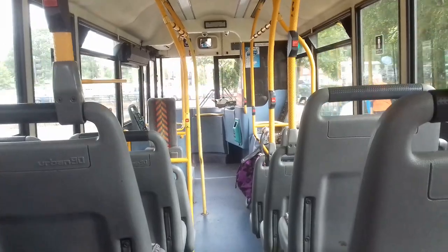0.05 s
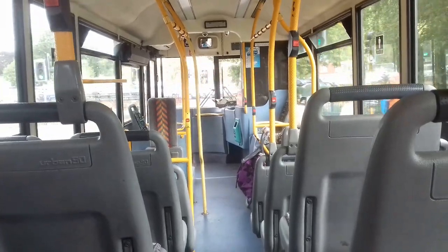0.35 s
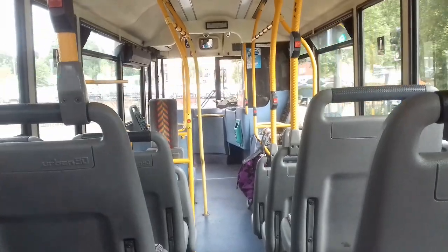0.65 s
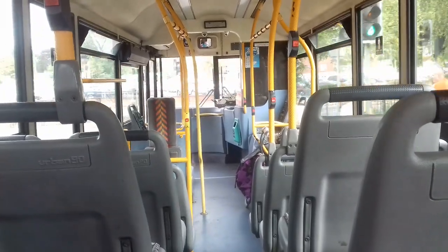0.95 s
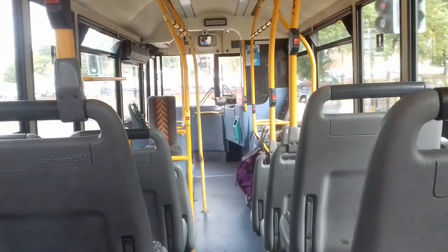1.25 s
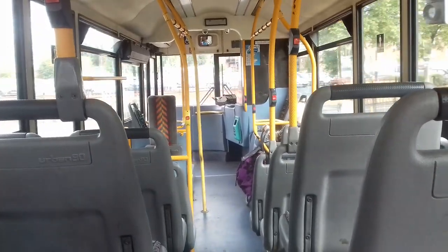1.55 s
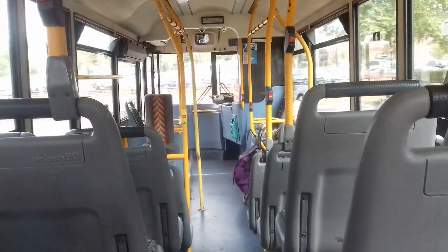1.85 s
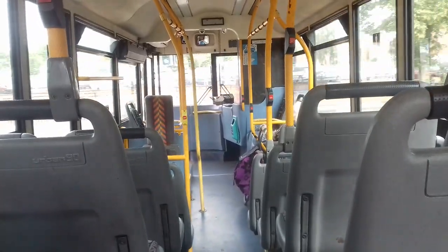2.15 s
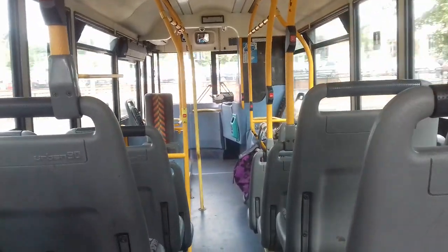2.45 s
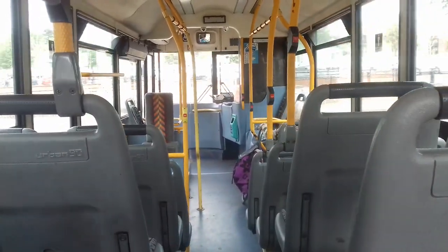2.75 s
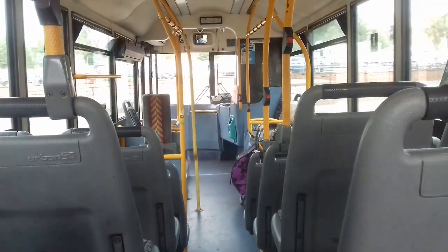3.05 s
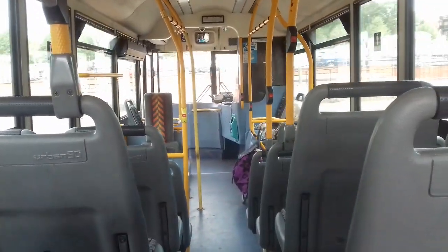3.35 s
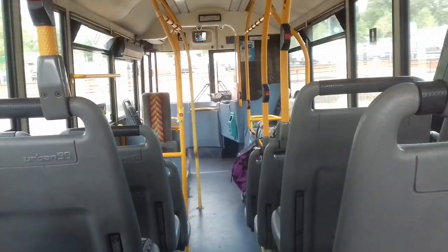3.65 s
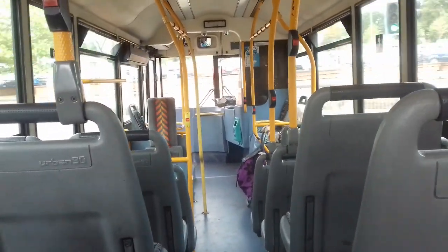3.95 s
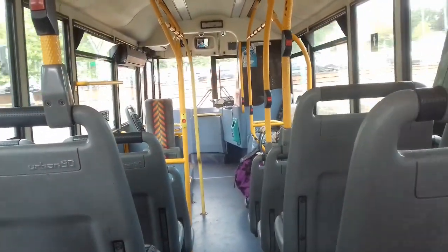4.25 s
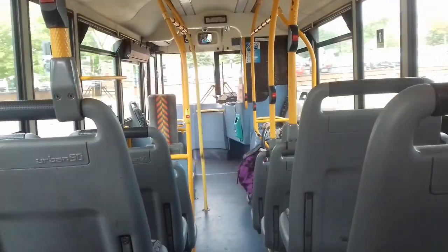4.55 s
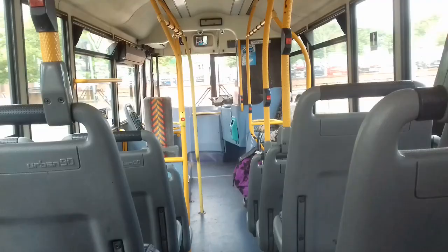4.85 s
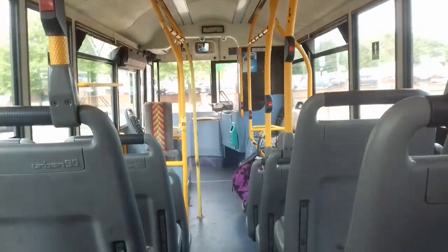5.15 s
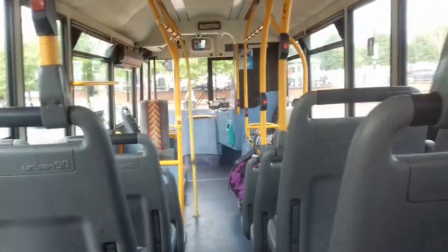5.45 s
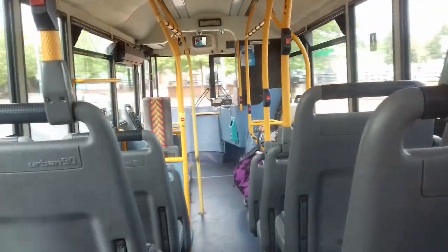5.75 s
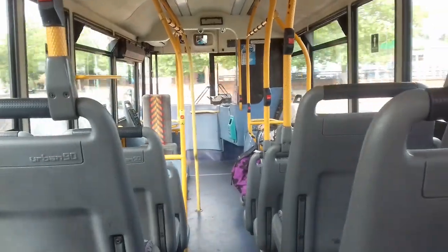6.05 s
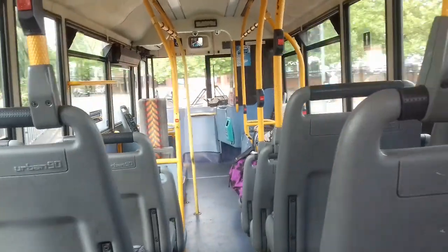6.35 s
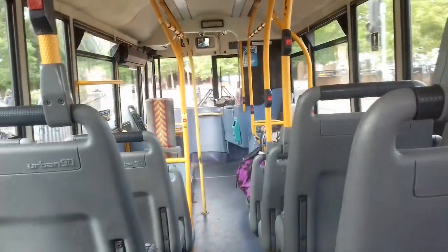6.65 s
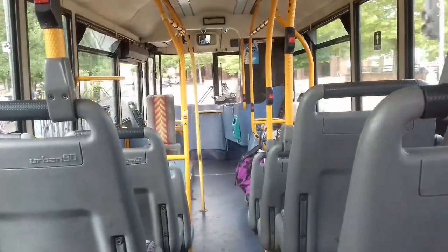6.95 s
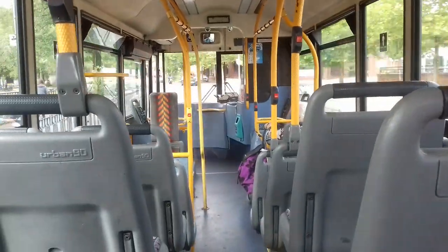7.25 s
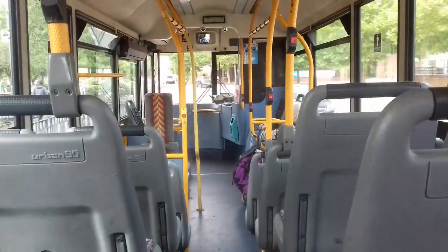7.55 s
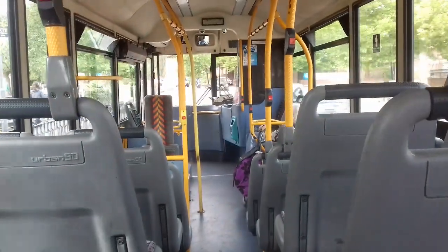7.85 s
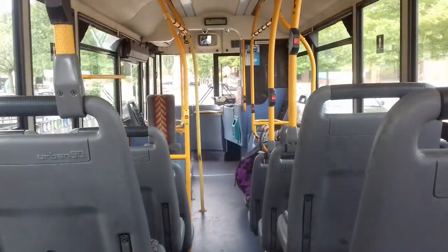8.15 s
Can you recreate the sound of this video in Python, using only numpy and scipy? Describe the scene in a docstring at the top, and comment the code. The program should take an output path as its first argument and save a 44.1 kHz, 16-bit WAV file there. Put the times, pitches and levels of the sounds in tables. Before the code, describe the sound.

From a rear seat inside a city bus, a loud, steady drone sits over a throbbing diesel engine slowly gaining speed. Loose panels buzz in surges that grow stronger, and an air valve spits once. About halfway through, the engine sags at a gear change, with brief trim squeaks and a few knocks. It then climbs again with a thin, rising turbo whistle as the rattling carries on.

```python
"""A loud drone over a throbbing diesel engine, heard from a rear seat as a city bus pulls away.
The drone, probably the cooling fan, follows the engine's speed up to a limit; both sag at a gear
change near 5 s. The fan's overtones (its higher notes) sing out as they cross pitches where the
cabin rings. Loose panels buzz in surges and knock, trim squeaks, an air valve spits once, and the
turbocharger whistles up in the new gear."""
import sys
import numpy as np
from scipy import signal
from scipy.fft import rfft, irfft
from scipy.io import wavfile
from scipy.ndimage import uniform_filter1d

SR = 44100
rng = np.random.default_rng(int(sys.argv[2]) if len(sys.argv) > 2 else 0)


def inscribe(sig):
    """Save sig as 16-bit PCM at rate SR to the path in sys.argv[1].

    A 1-D sig is mono; a 2-D sig holds one channel per row.
    Samples are clipped to [-1, 1] before scaling.
    """
    pcm = np.round(np.clip(np.atleast_2d(sig).T, -1, 1) * 32767)
    wavfile.write(sys.argv[1], SR, pcm.astype(np.int16))


N = 370440
TIME = np.arange(N) / SR

# Tone of the faint hiss. Each row: frequency in Hz, relative level in dB.
HISS_COLOUR = [(100, -3), (6000, 1.5), (8500, 2), (9500, -4.5), (10000, -16.5), (10700, -1.5),
               (14300, -1.5), (15000, -18.5), (15600, -11.5)]
# Squeaks of the trim. Each row: start in seconds, length in seconds, pitch in Hz, level in dB.
SQUEAKS = [(4.497, .35, 2649, -42.5), (4.86, .1, 4660, -67), (5.819, 0.15, 2700, -56.5),
           (5.829, 0.11, 1930, -43)]
# The air valve's spit. Each row: start in seconds, level in dB, seconds to fade by 60 dB.
AIR_SPITS = [(3.535, -32, 0.23)]
# Tone of the spit. Each row: frequency in Hz, relative level in dB.
AIR_COLOUR = [(600, -6.5), (2000, 3.5), (3600, 9.5), (5000, -1), (6500, -10), (7900, -10.5), (9300, -27),
              (10500, -36), (15000, -46)]
# Hard knocks of a panel. Each row: start in seconds, level in dB, seconds to fade by 60 dB.
KNOCKS = [(5.3, -30.5, 0.36), (5.425, -29, 0.045), (5.505, -33, 0.18)]
# Tone of a knock. Each row: frequency in Hz, relative level in dB.
KNOCK_COLOUR = [(900, -20), (2200, -4.5), (2600, 7.5), (3200, -2), (4500, -13), (6000, -23), (9000, -32),
                (11000, -48), (15000, -62)]
# The turbocharger winding up. Each row: time in seconds, pitch in Hz, level in dB in a full surge.
TURBO_SPIN = [(4.9, 3950, -81), (5.1, 3950, -50.5), (6, 4175, -51), (6.65, 4207, -52.5), (7, 4360, -49.5),
              (7.45, 4470, -46.5), (7.7, 4530, -46.5), (8.4, 4902, -47.5)]
# Tone of air rushing through the turbocharger. Each row: frequency in Hz, relative level in dB.
RUSH_COLOUR = [(2000, -14), (4300, 1), (5200, -3.5), (6500, -10.5), (7700, -7.5), (9200, -22), (10000, -35)]
# Surges of shaking in the bodywork. Each row: start in seconds, length in seconds, buzz level in dB.
SURGES = [(0.801, 0.5, -45.5), (1.25, 0.7, -43), (2.158, 0.13, -41), (2.3, 0.4, -45), (2.54, 0.63, -31.5),
          (3.16, 0.54, -32), (3.86, 0.24, -42.5), (3.95, 0.23, -29), (4.11, 0.31, -33.5),
          (4.448, 0.53, -30.5), (4.943, 0.69, -28.5), (5.24, 0.26, -29.5), (5.478, .2, -30.5),
          (5.753, 0.35, -38.5), (5.927, 0.33, -28), (6.061, 0.53, -31), (6.54, 0.55, -38),
          (6.8, .37, -28.5), (7.08, 0.84, -27.5), (7.828, 0.39, -32), (8.113, 0.38, -29.5)]
# Loose panel edges. Each row: when it strikes in the drone's cycle from 0 to 1, relative level in dB.
EDGES = [(.1, -4), (0.198, -0.5), (.32, -3), (.5, -3.5), (0.658, -6), (.95, -4)]
# Tone of the panel buzz. Each row: frequency in Hz, relative level in dB.
PANEL_COLOUR = [(120, -28.5), (330, -10), (600, 3), (1000, 5.5), (1520, 6.5), (2200, -0.9), (2620, 1.5),
                (2950, -4), (3900, -7.5), (4600, -14), (5200, -21), (6500, -31), (9000, -42),
                (10500, -60.5)]
# Engine speed. Each row: time in seconds, firings per second.
ENGINE_SPEED = [(.15, 38.08), (.6, 39.02), (.88, 39.95), (1.25, 40.12), (1.9, 39.94), (2.15, 40.74),
                (3, 42.45), (3.5, 43.89), (4.45, 47.81), (4.87, 46.36), (5.12, 42.08), (5.3, 40.84),
                (5.5, 40.31), (6, 42.12), (6.4, 42.83), (6.8, 43.85), (7.8, 48.07), (8.4, 47.86)]
# The deep throb at the firing rate. Each row: time in seconds, level in dB.
THROB = [(0.0, -45), (0.07, -41), (0.58, -43.5), (1.38, -36.5), (1.64, -43), (2.24, -34), (3.95, -37),
         (6.57, -34.5), (6.9, -49), (6.97, -40.5), (7.72, -32), (8.28, -46.5), (8.4, -40)]
# The cabin's boom at two and three times the firing rate. Each row: frequency in Hz, level in dB.
BOOM = [(76, -39), (80, -40), (82, -47.5), (87, -48.5), (91, -42), (94, -45.5), (97, -39.5), (114, -46.5),
        (120, -37), (123, -38), (129, -35), (140, -43.5)]
# Tone of the engine's roar. Each row: frequency in Hz, relative level in dB.
ROAR_COLOUR = [(15, -37.5), (35, -25), (65, -17), (110, -10.5), (150, -6.5), (188, 4), (245, -3), (350, 2),
               (440, -7.5), (560, -6), (780, -11), (1100, -16.5), (2000, -30), (3600, -42), (6000, -68)]
# The fan's lowest note. Each row: time in seconds, base level in dB.
FAN_LEVEL = [(.06, -28), (.36, -20.5), (.6, -25), (.85, -20), (4.25, -20.5), (4.46, -24.5), (4.65, -20),
             (6.62, -21.4), (6.92, -19), (8.4, -22.5)]
# The fan's overtones. Each row: multiple of the lowest note, base level in dB.
OVERTONES = [(2, -44.5), (3, -45), (4, -49), (5, -50), (6, -57), (7, -54.5)]
# Pitches where the cabin rings. Each row: pitch in Hz, width in Hz, boost in dB.
CABIN_RESONANCES = [(382, 30, 8), (414.4, 11, 9.5), (597, 8, 5.5), (630, 4.8, 6.5), (654, 5.8, 8),
                    (797, 10, 9), (806, 13, 8.5), (863, 11, 6)]
# An overtone briefly swells or fades.
# Each row: middle in seconds, half length in seconds, the overtone's multiple, change in dB.
FLARES = [(3.551, 0.32, 3, 7), (4.14, 0.28, 4, 11), (4.627, .2, 3, 6), (5.58, .15, 2, 5),
          (6.155, 0.23, 3, 4.5), (6.2, 0.19, 2, 1.5), (7.1, .35, 2, -8), (7.8, 0.83, 3, 1),
          (8.2, 0.25, 4, 10.5)]


def amp(db):
    """Turns decibels into a number to multiply by."""
    return np.exp(np.asarray(db) * (np.log(10) / 20))


def unit(x):
    """Scales a signal to an average strength (rms) of 1."""
    return x / np.sqrt(np.mean(x ** 2) + 1e-20)


def curves(rows):
    """Joins a table's points in time: one curve for each column after the first."""
    seconds, *columns = np.transpose(rows)
    return [np.interp(TIME, seconds, column) for column in columns]


def colour(x, points):
    """Shapes bass and treble to follow a tone table."""
    hz, db = np.transpose(points)
    bins = np.fft.rfftfreq(N, 1 / SR)
    return irfft(rfft(x) * amp(np.interp(np.log(bins + 1), np.log(hz), db)), N)


def wander(rate_hz, size=8192):
    """A smooth random wobble, mostly slower than the given rate."""
    step_s = N / SR / size
    hz = np.fft.rfftfreq(size, step_s)
    slow = irfft(rfft(rng.standard_normal(size)) / (1 + (hz / rate_hz) ** 4))
    return np.interp(TIME, np.arange(size) * step_s, unit(slow))


def turns(hz):
    """Counts the cycles completed at a changing rate."""
    return np.cumsum(hz) / SR


def sine(cycles):
    """A pure tone that starts anywhere in its cycle."""
    return np.sqrt(2) * np.sin(2 * np.pi * (cycles + rng.random()))


def whistle(cycles, width_hz):
    """A fuzzy tone: a narrow band of noise around a pitch."""
    angle = 2 * np.pi * cycles
    return unit(wander(width_hz) * np.cos(angle) + wander(width_hz) * np.sin(angle))


def burst(start, db, fade_s, tone, crack, crack_s):
    """Noise that starts with a crack and dies away."""
    age = np.maximum(TIME - start, 0)
    fall = (TIME > start) * (np.exp(-np.log(1000) * age / fade_s) + crack * np.exp(-age / crack_s))
    noise = rng.standard_normal(N)
    return amp(db) * colour(fall * noise, tone) / np.std(colour(noise, tone))


def cabin(x, echo_db, fade_s, echoes_per_s=4000):
    """Adds many quick echoes from windows, roof and seats."""
    t = TIME[:SR // 2]
    echoes = rng.choice([-1., 1.], len(t)) * (rng.random(len(t)) < echoes_per_s / SR) * (t > .003)
    tail = echoes * np.exp(-np.log(1000) * t / fade_s)
    return x + amp(echo_db) * signal.oaconvolve(x, tail / np.linalg.norm(tail))[:N]


def hiss(level_db=-71):
    """A faint, even hiss behind everything."""
    return amp(level_db) * unit(colour(rng.standard_normal(N), HISS_COLOUR))


def squeaks():
    """Trim rubs and sings briefly."""
    out = np.zeros(N)
    for start, length, hz, db in SQUEAKS:
        progress = np.clip((TIME - start) / length, 0, 1)
        arch = np.sqrt(abs(np.sin(np.pi * progress)))
        out += amp(db) * arch * whistle(hz * TIME, width_hz=74)
    return out


def air_valve():
    """Compressed air escapes in one short spit."""
    return sum(burst(*spit, AIR_COLOUR, crack=1.02, crack_s=0.006) for spit in AIR_SPITS)


def knocks():
    """At the height of the shaking a panel hits its frame."""
    return sum(burst(*knock, KNOCK_COLOUR, crack=0.65, crack_s=.002) for knock in KNOCKS)


def turbo(swell, airy_db=-3, rush_db=-10, lull_db=-17):
    """The spinning turbocharger makes a thin, wavering whistle inside rushing air."""
    hz, db = curves(TURBO_SPIN)
    drop_db = lull_db * (1 - swell) ** 2  # its pressure drops between surges
    spin = turns(hz * (1 + .0026 * wander(20)))
    clear = sine(spin) * amp(2 * wander(30) - 1.2)
    airy = whistle(spin, width_hz=120)
    rush = unit(colour(rng.standard_normal(N), RUSH_COLOUR))
    return amp(db + drop_db) * (clear + amp(airy_db) * airy + amp(rush_db) * rush)


def shaking(arch_shape=0.55):
    """How hard the bodywork shakes: each surge rises and falls in a steep-sided arch."""
    power = np.zeros(N)
    for start, length, db in SURGES:
        during = (TIME > start) & (TIME < start + length)
        arch = abs(np.sin(np.pi * (TIME[during] - start) / length)) ** arch_shape
        power[during] += (amp(db) * arch) ** 2
    return np.sqrt(abs(uniform_filter1d(power, size=SR // 25)))


def panels(blade_cycles, load_db, shake, scatter_cycles=.12, spread_db=4, scrape=.5,
           rest_db=-44, graze_db=-4):
    """Shaken by the drone, loose edges strike once a cycle, unevenly, with a little scrape."""
    strikes = np.zeros(N)
    for place, db in EDGES:
        position = blade_cycles - place + scatter_cycles * wander(150)
        count = np.floor(np.maximum.accumulate(position))  # steps up at each strike
        strength = amp(db + spread_db * np.clip(rng.standard_normal(N), -2, 2))
        clicks = np.diff(count, prepend=count[0]) * strength
        strikes += cabin(clicks, echo_db=2.5, fade_s=0.074)  # each edge has its own echoes
    rubbing = rng.standard_normal(N) * (1 + 0.31 * np.cos(2 * np.pi * blade_cycles))
    buzz = unit(colour(unit(strikes) + scrape * rubbing, PANEL_COLOUR))
    rest = amp(rest_db + 2 * load_db)  # the buzz between surges
    force_db = 20 * np.log10(np.hypot(rest, shake))
    # Harder hits are shorter, so brighter; between surges the edges only graze and sound duller.
    treble_db = 0.015 * (force_db - force_db.max()) + graze_db * (1 - shake / amp(force_db)) ** 2
    treble = colour(buzz, [(2500, -30), (4000, -8), (6000, 0)])
    buzz += treble * (amp(treble_db) - 1)
    return buzz * amp(force_db + 0.84 * wander(11))


def engine(firing_hz, load_db, swell, roar_db=-25.5, surge_db=4.5, pulse_depth=0.11):
    """The firings make deep tones and a pulsing roar that grows with load and with each surge."""
    firings = turns(firing_hz)
    boom = amp(curves(THROB)[0]) * sine(firings)
    for multiple in (2, 3):
        boom_db = np.interp(multiple * firing_hz, *np.transpose(BOOM))
        boom += amp(boom_db - 0.1 * wander(6)) * sine(multiple * firings)
    pulse = 1 + pulse_depth * np.cos(2 * np.pi * firings)
    roar = unit(colour(rng.standard_normal(N) * pulse, ROAR_COLOUR))
    return boom + roar * amp(roar_db + load_db + surge_db * swell + 0.45 * wander(9.9))


def fan_rate(firing_hz, blades_per_firing=4.945, limit_hz=218.7, sharpness=46):
    """Blades passing per second: follows the engine, then levels off at the fan's limit."""
    free_hz = blades_per_firing * firing_hz
    return limit_hz / (1 + (limit_hz / free_hz) ** sharpness) ** (1 / sharpness)


def fan(blade_hz, load_db, swell, surge_db=1, overtone_surge_db=4.5, flutter_db=.5, waver_db=1.47):
    """Passing blades make a strong, clean note; its wavering overtones swell where the cabin rings."""
    cycles = turns(blade_hz) + 0.0037 * wander(12)
    drone = amp(curves(FAN_LEVEL)[0] + surge_db * swell + flutter_db * wander(3.2)) * sine(cycles)
    for multiple, db in OVERTONES:
        ring_db = sum(boost / (1 + (2 * (multiple * blade_hz - hz) / width) ** 2)
                      for hz, width, boost in CABIN_RESONANCES)
        flare_db = sum(change * np.exp(-((TIME - middle) / half) ** 2)
                       for middle, half, which, change in FLARES if which == multiple)
        level_db = db + load_db + overtone_surge_db * swell + ring_db + flare_db
        drone += amp(level_db + waver_db * wander(12)) * sine(multiple * cycles)
    return drone


def scene(cruise_hz=45.16, db_per_doubling=6.5, full_surge_db=-31):
    """Adds up all sounds at the seat; engine speed and shaking drive the main ones."""
    firing_hz, shake = curves(ENGINE_SPEED)[0], shaking()
    blade_hz = fan_rate(firing_hz)
    load_db = db_per_doubling * np.log2(firing_hz / cruise_hz)  # faster is louder
    swell = np.tanh(shake / amp(full_surge_db))  # 0 between surges, near 1 in a strong one
    machinery = engine(firing_hz, load_db, swell) + fan(blade_hz, load_db, swell)
    machinery += turbo(swell) + air_valve()
    bodywork = panels(turns(blade_hz), load_db, shake) + knocks() + squeaks()
    return (hiss() + bodywork + machinery)[None]


def record(dry, cutoff_hz=15700):
    """Cuts off the very highest treble."""
    taps = signal.firwin(511, cutoff_hz, window=("kaiser", 9), fs=SR)
    return signal.oaconvolve(dry, taps[None], "same")


dry = scene()
out = record(dry)
inscribe(out)
```